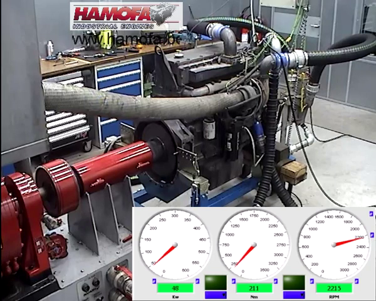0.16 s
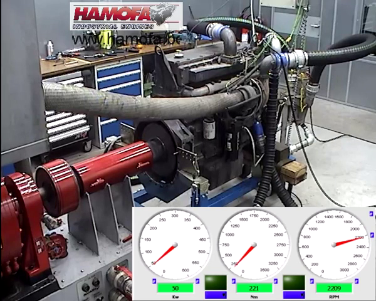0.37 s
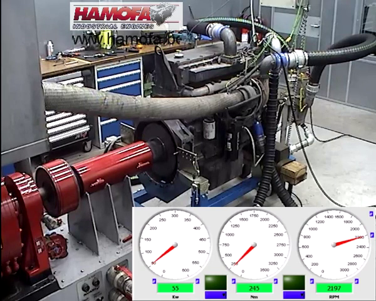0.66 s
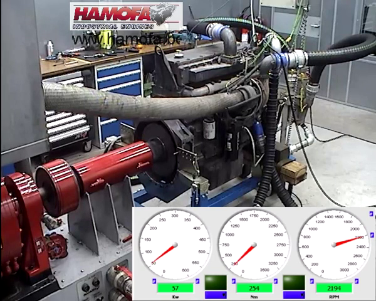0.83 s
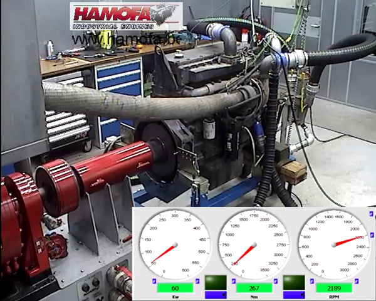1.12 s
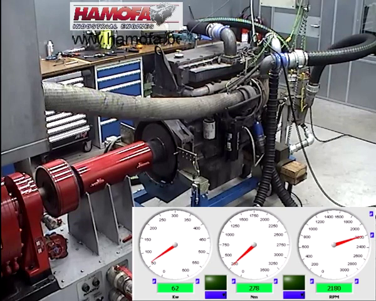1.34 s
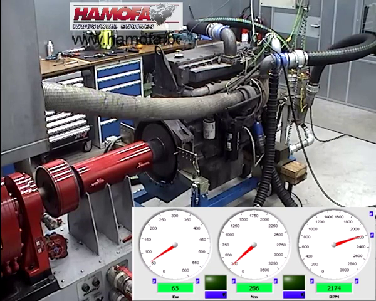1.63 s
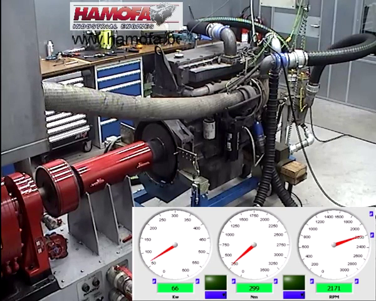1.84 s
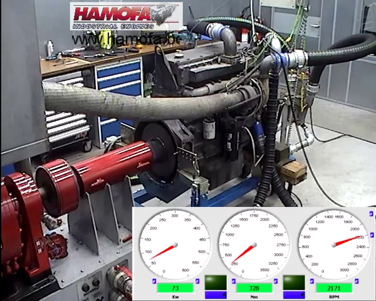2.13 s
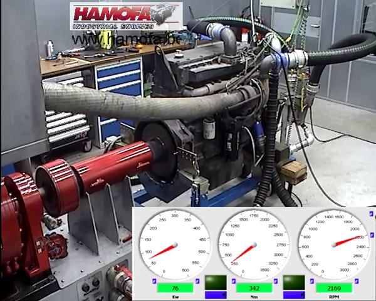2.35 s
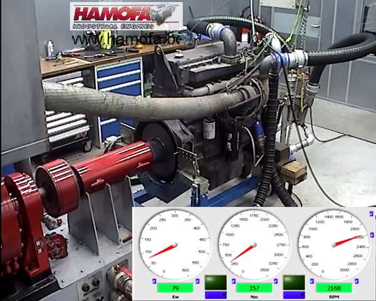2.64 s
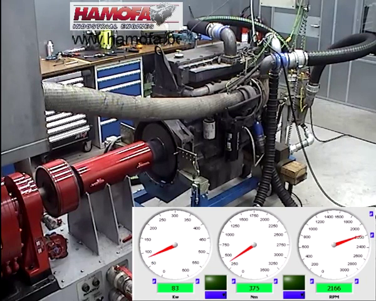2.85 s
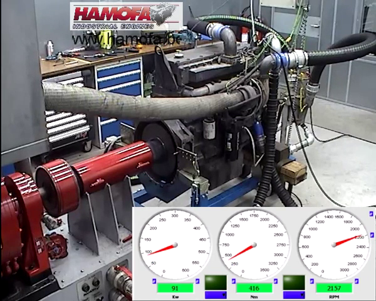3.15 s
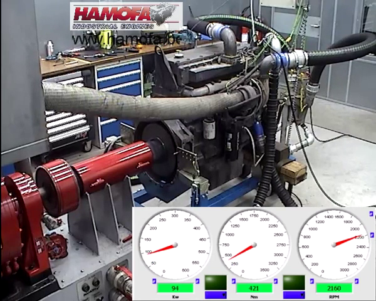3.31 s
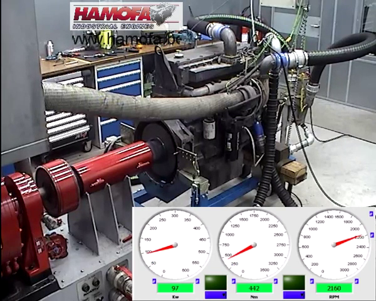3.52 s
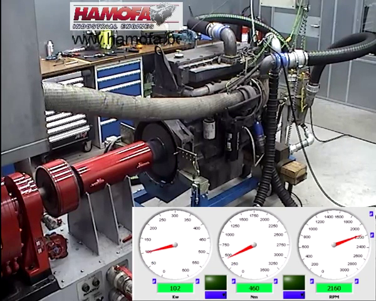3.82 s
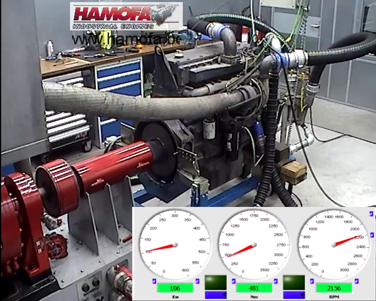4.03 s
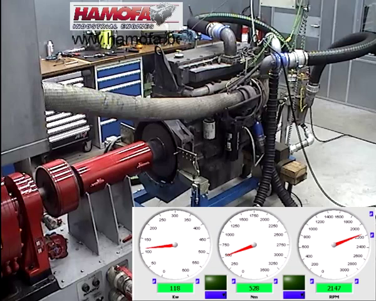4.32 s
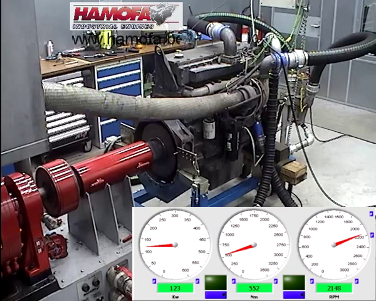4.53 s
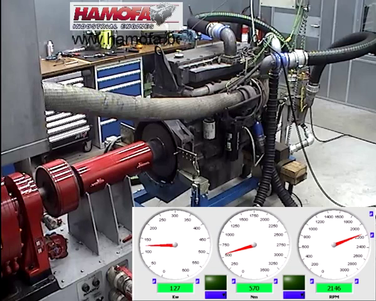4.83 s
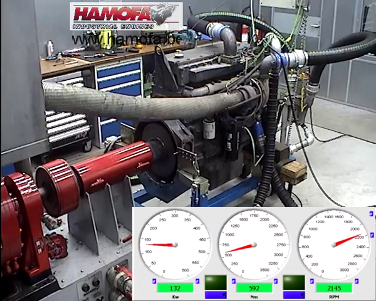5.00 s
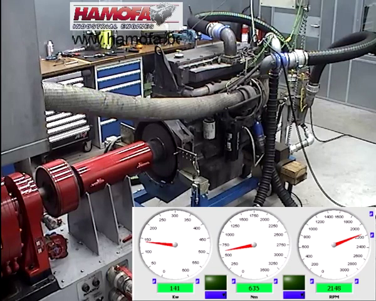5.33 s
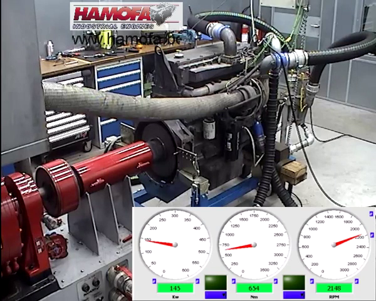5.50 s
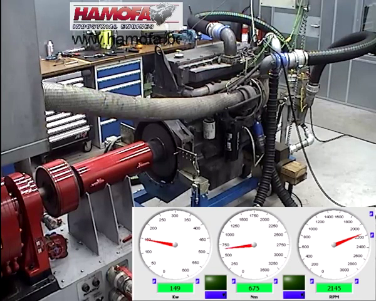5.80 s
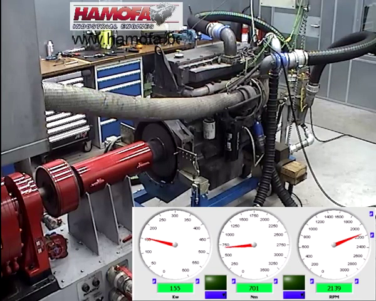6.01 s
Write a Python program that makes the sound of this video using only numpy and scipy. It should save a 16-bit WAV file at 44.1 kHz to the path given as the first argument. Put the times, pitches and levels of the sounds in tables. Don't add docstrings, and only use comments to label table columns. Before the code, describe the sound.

A big diesel engine roars steadily in a hard test room, clattering and humming, while a thin turbo whistle climbs and the load deepens.

```python
import sys
import numpy as np
from scipy import signal
from scipy.fft import rfft, irfft
from scipy.io import wavfile
from scipy.ndimage import uniform_filter1d, map_coordinates

SR = 44100
rng = np.random.default_rng(int(sys.argv[2]) if len(sys.argv) > 2 else 0)


def pcm_store(signal):
    levels = np.round(np.clip(np.atleast_2d(signal), -1, 1) * 32767)
    wavfile.write(sys.argv[1], SR, levels.astype(np.int16).T)


def volts_from_db(level):
    exponent = np.asarray(level, float) / 20
    return 10 ** exponent


N = 271656
TIME_S = np.arange(N) / SR
FOLD_HZ = 8000
CHANGE_NM = 34

# t/s, crank speed/Hz, brake torque/Nm
BRAKE = [
    (0, 36.93, 205),
    (.4, 36.703, 228),
    (1, 36.508, 262),
    (1.6, 36.215, 290),
    (2.15, 36.055, 330),
    (2.65, 36.085, 368),
    (3.4, 35.962, 438),
    (4.2, 35.785, 515),
    (5.3, 35.745, 618),
    (6.16, 35.62, 715),
]
TORQUE_NM = np.interp(TIME_S, *np.transpose(BRAKE)[::2])


def evened(x):
    return x / np.sqrt(np.mean(x ** 2) + 1e-20)


def curve(rows):
    s, *columns = np.transpose(rows)
    return [np.interp(TIME_S, s, column) for column in columns]


def wander(rate_hz, count):
    knots = rng.standard_normal((count, 400))
    at = np.arange(0, N + 256, 256) / SR * rate_hz
    slow = [map_coordinates(k, [at], order=3) for k in knots]
    return [np.interp(np.arange(N), np.arange(len(at)) * 256, s) for s in slow]


def shift(light_db, loaded_db, at_nm, span_nm):
    load = (1 + np.tanh((TORQUE_NM - at_nm) / span_nm)) / 2
    return light_db + (loaded_db - light_db) * load


def crank():
    return 2 * np.pi * np.cumsum(curve(BRAKE)[0]) / SR


def rumble():
    hz = np.fft.rfftfreq(N, 1 / SR)
    shape = (hz / 22) ** 2 / (1 + (hz / 24) ** 4.9)
    lumps_db = 1.5 * wander(rate_hz=8., count=1)[0]
    level_db = shift(light_db=-38, loaded_db=-35.5, at_nm=350, span_nm=CHANGE_NM) + lumps_db
    return volts_from_db(level_db) * evened(irfft(rfft(rng.standard_normal(N)) * shape, N))


def shudders():
    # t/s, length/s, f/Hz, level/dB
    swells = [(0.821, 0.11, 36, -30), (0.846, .3, 20.5, -35), (1.487, .3, 22.7, -30.5), (2.6, .2, 28, -37),
              (3.1, 0.81, 21.7, -34.5), (3.5, 0.5, 36.2, -32.5), (2.9, .35, 82, -45),
              (3.448, 0.55, 80, -44.5), (4, .3, 40, -39), (4.355, .07, 32, -29), (4.605, 0.26, 21, -24),
              (4.626, 0.12, 36, -35), (4.804, .06, 26, -30), (5.03, 0.18, 35, -30), (5.399, 0.37, 36, -26),
              (5.693, .09, 30, -37), (5.982, 0.11, 33, -23.5)]
    out = np.zeros(N)
    for s, length_s, hz, db in swells:
        since = TIME_S - s
        swell = np.exp(-(2 * since / length_s) ** 2)
        out += np.sqrt(2) * volts_from_db(db) * swell * np.cos(2 * np.pi * hz * since)
    return out


def turbo(angle):
    # t/s, blade passing f/Hz
    blade_pitch = [(0, 6648), (.16, 6660), (.33, 6680), (.49, 6716), (.98, 6945), (1.3, 7155), (1.63, 7385),
                   (1.79, 7520), (2.28, 8005), (2.6, 8310), (3.09, 8718), (4, 9370), (4.6, 9640),
                   (6.16, 10080)]
    # f/Hz, width/Hz, level/dB
    duct_modes = [(6658, 15, -39), (6680, 20, -42.5), (6800, 32, -33), (6850, 20, -31.5), (6900, 30, -35.5),
                  (6945, 24, -36), (7030, 110, -38), (7105, 36, -26.5), (7180, 40, -28.5),
                  (7240, 70, -27.5), (7345, 80, -33), (7530, 60, -40), (7650, 40, -40), (7740, 56, -40)]
    # f/Hz, level/dB
    duct_leak = [(6630, -60), (7500, -47.5), (7900, -52.5), (8310, -62.5), (8640, -62), (8800, -68)]
    shaft_db = [-67, -65]
    blades, shaft_orders, shaft_from_s = 7, [4, 5], 3.6

    pitch = curve(blade_pitch)[0]
    flutter, drift = wander(rate_hz=45., count=2)
    turn = 2 * np.pi * np.cumsum(pitch + 7 * drift) / SR
    pulse = .16 * np.cos(3 * angle)
    fade = np.interp(TIME_S, [.05, .09, 3, 3.3], [0, 1, 1, 0])
    duct = sum(volts_from_db(db) ** 2 / (1 + (2 * (pitch - hz) / w) ** 2) ** 2 for hz, w, db in duct_modes)
    leak = volts_from_db(np.interp(pitch, *np.transpose(duct_leak))) ** 2
    level = volts_from_db(0.7) * np.sqrt(duct + leak)
    whistle = level * volts_from_db(1.6 * flutter) * fade * np.cos(turn + pulse)

    echo_s, echo_share, echo_from_hz = .023, .7, 7300
    echo = echo_share * np.clip((pitch - echo_from_hz) / 250, 0, 1)
    whistle = (whistle + echo * np.roll(whistle, round(echo_s * SR))) / np.hypot(1, echo)

    rise = np.clip((TIME_S - shaft_from_s) / .5, 0, 1)
    shaft = sum(volts_from_db(db + 4 * drift) * np.cos(turn * k / blades) for k, db in zip(shaft_orders, shaft_db))
    return np.sqrt(2) * (whistle + rise * shaft)


def orders(angle):
    # multiple of crank speed, light
    # level/dB, loaded level/dB, torque of change/Nm
    crank_tones = [(.5, -47, -52, 300), (1, -30, -44, 378), (1.5, -70, -49, 320), (2, -49, -58, 340),
                   (3, -33.5, -31.3, 380), (4, -49, -46.5, 300), (4.5, -56, -45, 390), (5, -39, -40.5, 290),
                   (6, -30, -29, 330), (6.5, -49, -53, 270), (7, -48, -47, 300), (7.5, -58, -46.5, 325),
                   (8, -47, -37, 305), (9, -39, -36, 380), (9.5, -50, -47, 540), (10, -36, -38, 345),
                   (10.5, -66, -54, 450), (11, -61, -50.5, 285), (12, -56, -63, 480), (13, -57, -48.5, 320),
                   (14, -68, -60, 290), (15, -60, -65, 400), (16, -61, -66, 285), (17, -68, -72, 480),
                   (18, -63, -62, 400), (19, -50, -48.5, 300), (20, -62, -57, 280), (21, -58, -56, 320),
                   (22, -55, -37, 300), (23, -54, -54, 300), (24, -40.5, -56, 300), (25, -51, -36, 550),
             (25.5, -53, -44.5, 410), (26, -47, -51, 355), (27, -45, -43.5, 360), (27.5, -49, -48, 400),
             (28, -50, -39, 325), (28.5, -49, -43, 400), (29, -58, -39.5, 292), (30, -42, -58, 280),
             (30.5, -60, -50, 410), (31, -45, -45, 340), (31.5, -52, -40, 495), (32, -51, -41, 450),
             (33, -64, -52, 290), (37, -56, -54, 480), (38, -54, -49, 320), (39, -48, -49, 400),
             (40, -56, -49, 600)]
    dipping = [10, 31]
    dip_nm = 67
    passing = {12: (-48.5, 370, 110), 23: (-41.5, 370, 110), 25: (-43, 365, 45)}

    out = np.zeros(N)
    sway = wander(rate_hz=11., count=12)
    uneven = angle + 0.018 * np.sin(angle / 2 + 2 * np.pi * rng.random())
    for n, (k, light_db, loaded_db, at_nm) in enumerate(crank_tones):
        size = volts_from_db(shift(light_db, loaded_db, at_nm, CHANGE_NM))
        if k in dipping:
            size = size * np.hypot(.2, np.tanh((TORQUE_NM - at_nm) / dip_nm))
        if k in passing:
            db, peak_nm, span_nm = passing[k]
            size = size + volts_from_db(db) * np.exp(-((TORQUE_NM - peak_nm) / span_nm) ** 4)
        loose = min(k / 28, 1) ** 4
        size = size * volts_from_db((.6 + 2.4 * loose) * sway[n % 12])
        turn = uneven if k % 3 == 0 and k < 10 else angle
        spread = np.pi * (3 / 4 + 5 / 12 * k ** 2)
        phase = k * turn + spread + .5 * loose * sway[(n + 5) % 12]
        out += np.sqrt(2) * size * np.cos(phase)
    return out


def block_gain(hz):
    # f/Hz, width/Hz, level/dB
    modes = [(129, 630, -15.5), (247, 290, -11.5), (328, 115, -11.5), (690, 120, -25.5), (859, 160, -12),
             (979, 183, -9.5), (1135, 240, -13), (1391, 178, -11), (1631, 90, -14), (1784, 140, -15),
             (2066, 410, -18.5), (2317, 100, -17.5), (2543, 299, -12.5), (2810, 62, -26), (2990, 150, -28),
             (3278, 310, -27.5), (3500, 85, -29), (3777, 130, -25.5), (4133, 410, -20.5), (4250, 75, -24),
             (4520, 175, -16.5), (4825, 490, -16), (5140, 200, -22), (5440, 100, -29.5),
             (5570, 76.0, -37.5), (5930, 205, -19.5), (6210, 300, -27), (6810, 280, -25.5),
             (7190, 410, -23.5), (7660, 451.0, -35)]
    return np.sqrt(sum(volts_from_db(db) ** 2 / (1 + (2 * (hz - f) / w) ** 2) ** 2.71 for f, w, db in modes))


def band(spectrum, hz, lo_hz, hi_hz):
    rise = np.clip((hz - lo_hz) / 40 + .5, 0, 1)
    fall = np.clip((hi_hz - hz) / 40 + .5, 0, 1)
    return evened(irfft(spectrum * rise * fall, N))


def clatter(angle):
    throb_orders = [
        (.5, .1),
        (1, .16),
        (2.5, .08),
        (3, .14),
        (5, .1),
    ]
    # lowest f/Hz, highest f/Hz, share that repeats each cycle, share of the throb
    registers = [
        (60, 600, .3, .3),
        (600, 1550, .55, 1),
        (1550, FOLD_HZ + 25, .45, .7),
    ]
    # light level/dB, loaded level/dB, torque of change/Nm
    levels = [
        (-40.5, -42, 450),
        (-35, -32.5, 300),
        (-36, -33.5, 390),
    ]

    pattern = rng.standard_normal((3, 900))
    place = angle / (4 * np.pi) % 1 * 899
    slide = np.arange(N) / N * np.pi + np.arange(3)[:, None] * 2 * np.pi / 3
    repeat = evened(sum(g * np.interp(place, np.arange(900), p) for g, p in zip(np.cos(slide), pattern)))
    throb = sum(depth * np.cos(k * angle + 2 * np.pi * rng.random()) for k, depth in throb_orders)
    noise = rng.standard_normal(N)
    swells = wander(rate_hz=9., count=3)
    hz = np.fft.rfftfreq(N, 1 / SR)
    ring = block_gain(hz)
    out = np.zeros(N)
    for level, swell, (lo_hz, hi_hz, locked, share) in zip(levels, swells, registers):
        drive = locked * repeat + (1 + share * throb) * noise
        level_db = shift(*level, span_nm=29) + 0.45 * swell
        out += volts_from_db(level_db) * band(rfft(drive) * ring, hz, lo_hz, hi_hz)
    return out


def patchy(x):
    z = signal.stft(x, SR, nperseg=1024, noverlap=768)[2]
    field = uniform_filter1d(rng.standard_normal(z.shape), size=6, axis=0)
    field = uniform_filter1d(field, size=20, axis=1)
    swell_db = 1.02 * evened(field)
    return signal.istft(z * volts_from_db(swell_db), SR, nperseg=1024, noverlap=768)[1][:N]


def scene():
    angle = crank()
    engine = orders(angle) + patchy(clatter(angle))
    return (rumble() + shudders() + turbo(angle) + engine)[None]


def folded(x):
    # f above the fold/Hz, level/dB
    image = [(0, 3), (300, -4.5), (700, -10), (1000, -14.5), (1250, -19.5), (1400, -25.5), (1550, -48),
             (1700, -33), (2000, -29.5), (2130, -42.5), (2220, -86)]
    z, fold = rfft(x), round(FOLD_HZ * N / SR)
    step = np.arange(1, fold // 2)
    low = z[:fold + 1].copy()
    low[fold - step] += np.conj(z[fold + step])
    image_hz, image_db = np.transpose(image)
    out = np.zeros_like(z)
    out[:fold + 1] = low
    image_gain = volts_from_db(np.interp(step * SR / N, image_hz, image_db, right=-200))
    out[fold + step] = np.conj(low[fold - step]) * image_gain
    return irfft(out, N)


def treble_gated(x):
    # f/Hz, depth under the loudest treble/dB
    gate = [(5800, 50), (8000, 44.5), (9000, 50), (10000, 54)]
    hz, _, z = signal.stft(x, SR, nperseg=1024, noverlap=512)
    treble = hz > 5800
    power = abs(z[treble]) ** 2
    groups = power[:len(power) // 4 * 4].reshape(-1, 4, z.shape[1])
    bands = np.repeat(groups.mean(1), 4, axis=0)
    loudest = uniform_filter1d(power.max(0), size=3)
    depth_db = np.interp(hz[treble][:len(bands), None], *np.transpose(gate))
    keep = bands > loudest * volts_from_db(-depth_db) ** 2
    z[np.flatnonzero(treble)[:len(keep)]] *= keep
    return signal.istft(z, SR, nperseg=1024, noverlap=512)[1][:N]


def roll_off(x):
    return signal.sosfilt(signal.butter(12, 10020, fs=SR, output="sos"), x)


def record(dry):
    mix = treble_gated(folded(dry[0]))[None]
    return roll_off(mix)


dry = scene()
out = record(dry)
pcm_store(out)
```